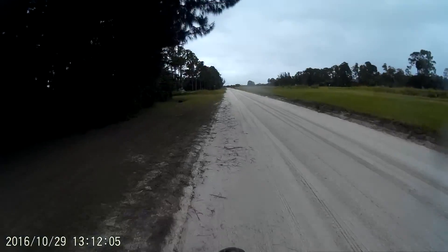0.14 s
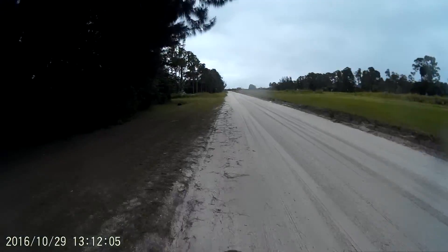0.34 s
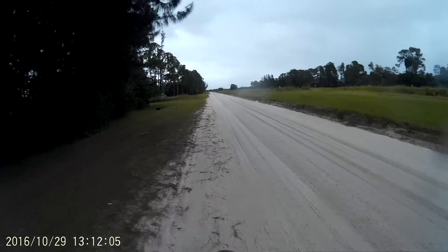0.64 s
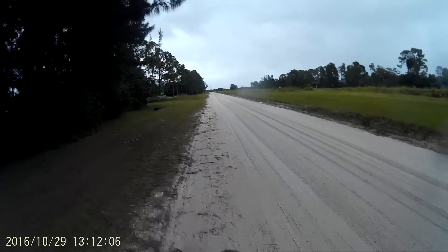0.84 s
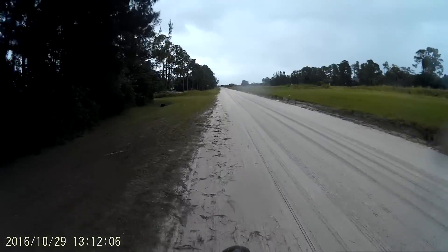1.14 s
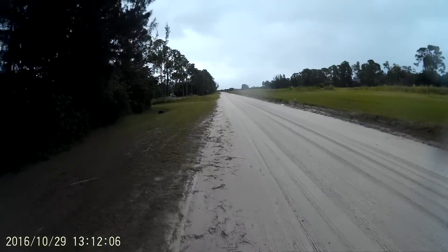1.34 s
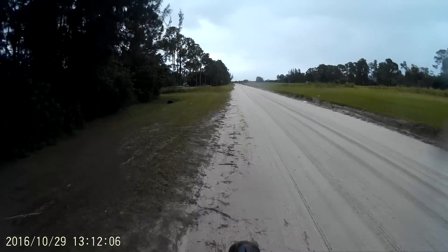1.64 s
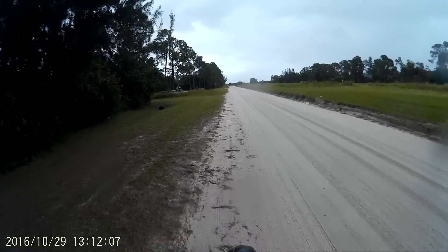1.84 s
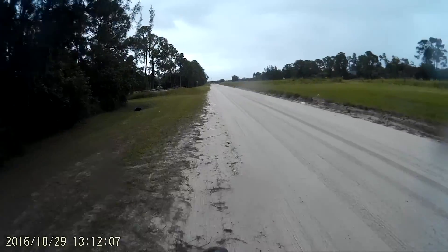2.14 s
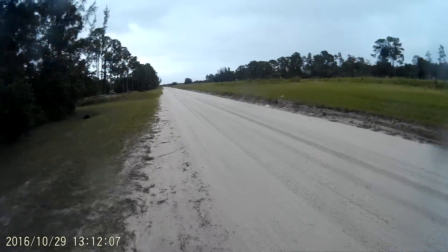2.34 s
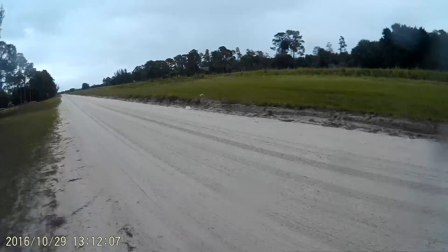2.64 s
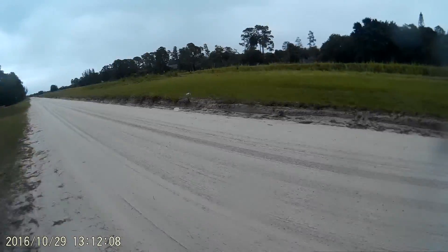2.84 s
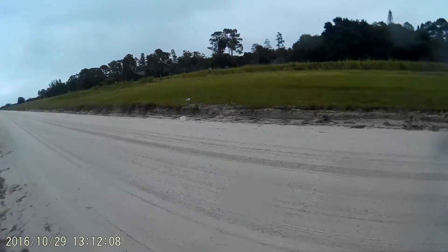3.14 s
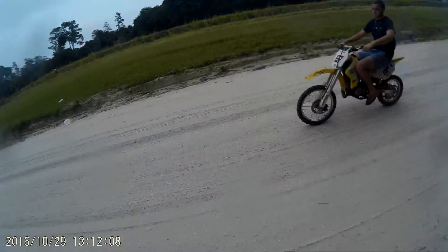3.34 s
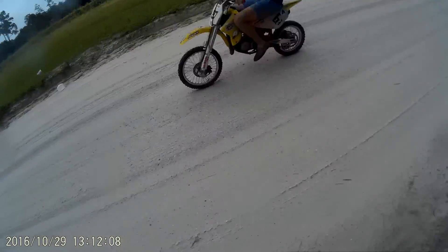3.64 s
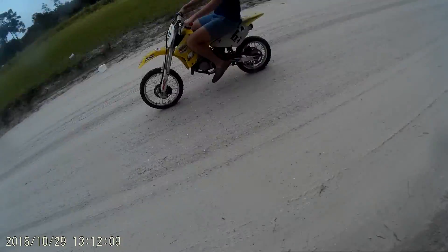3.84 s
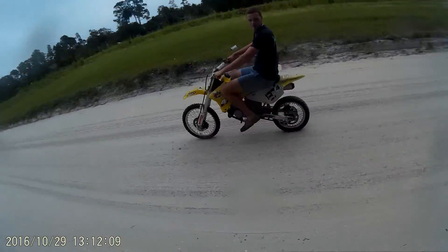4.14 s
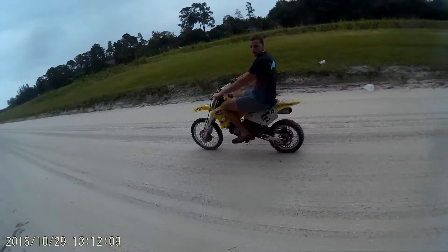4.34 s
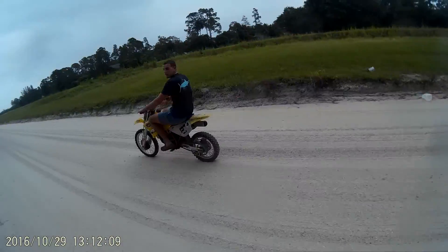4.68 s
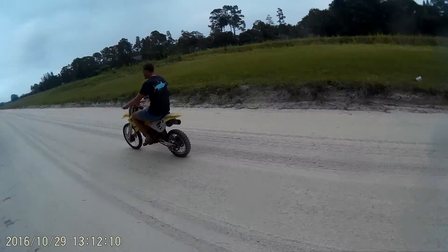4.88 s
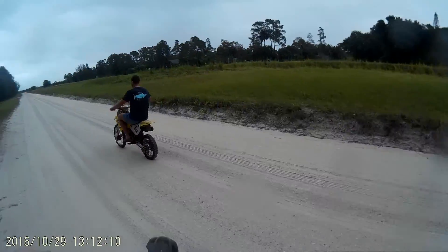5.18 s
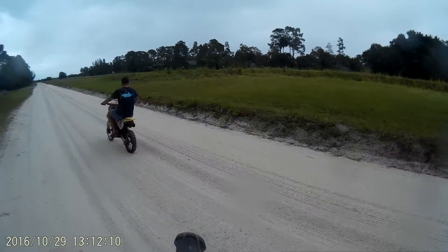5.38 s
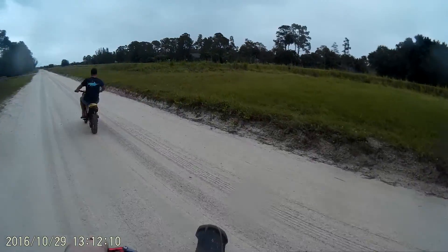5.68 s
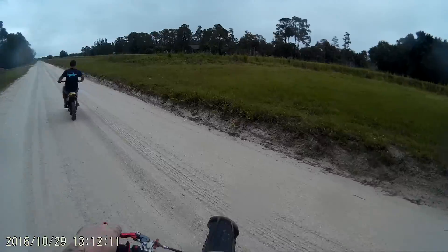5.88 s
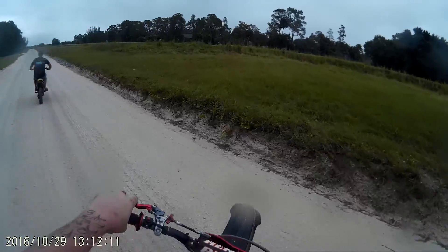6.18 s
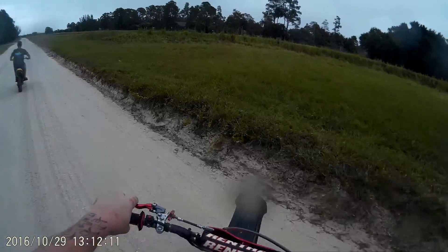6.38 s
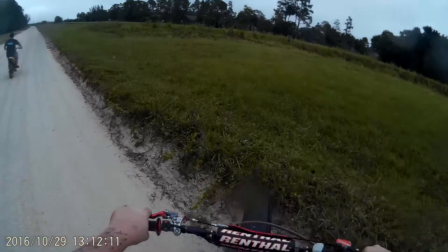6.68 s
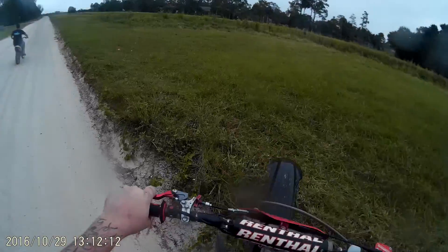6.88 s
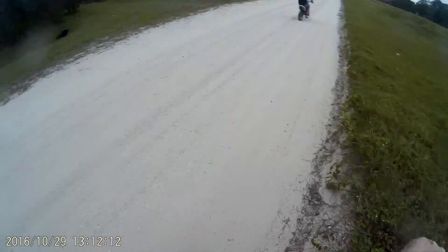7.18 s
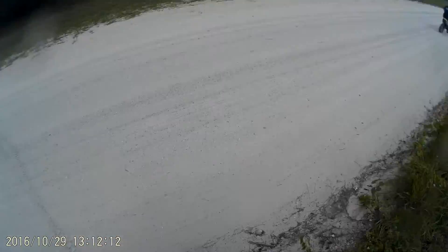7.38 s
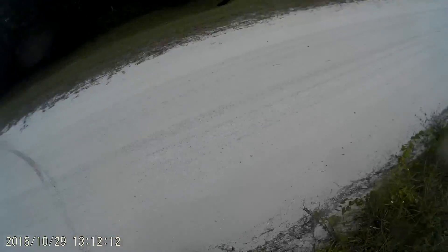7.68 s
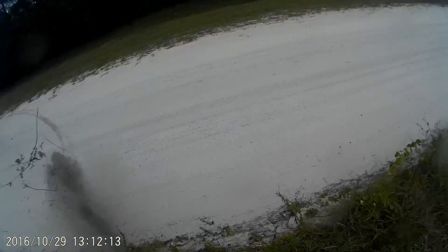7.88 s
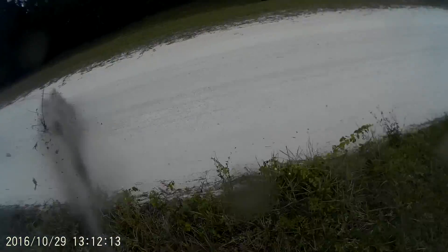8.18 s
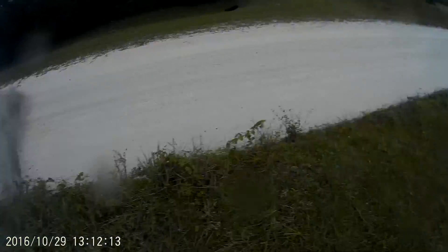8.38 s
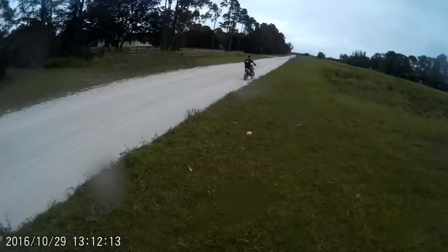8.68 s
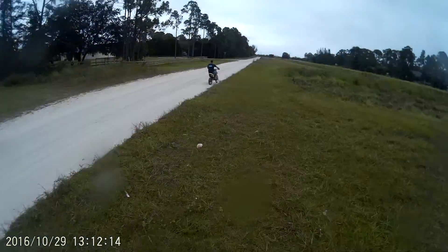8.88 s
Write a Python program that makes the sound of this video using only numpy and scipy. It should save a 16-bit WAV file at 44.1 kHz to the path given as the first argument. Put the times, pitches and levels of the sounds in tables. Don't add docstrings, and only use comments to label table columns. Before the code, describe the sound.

Heard from a cased helmet camera outdoors, a two-stroke dirt bike hums and rattles at idle with sparse soft bangs. A second bike sputters past around three to four seconds. The near engine then blips raggedly, lugs evenly, blips harder, tears into a full-throttle wheelspin, snaps twice after shut-off and revs again. Low wind rumble and tyre hiss sit underneath.

```python
import sys
import numpy as np
from scipy import signal
from scipy.fft import rfft, irfft
from scipy.io import wavfile
from scipy.ndimage import uniform_filter1d

SR = 44100
rng = np.random.default_rng(int(sys.argv[2]) if len(sys.argv) > 2 else 0)


def digitize_waveform(pressure):
    field = np.atleast_2d(pressure).T
    bounded = np.clip(field, -1, 1)
    quanta = np.round(bounded * 32767).astype(np.int16)
    wavfile.write(sys.argv[1], SR, quanta)


def gain_from_db(level_db):
    decades = np.asarray(level_db, float) / 20
    return 10 ** decades


N = 397782


def colour(x, slope, modes=(), size=8192):
    hz = np.maximum(np.arange(size // 2 + 1) * SR / size, 1)
    slope_hz, slope_db = np.transpose(slope)
    db = np.interp(np.log(hz), np.log(slope_hz), slope_db)
    db = db + sum(g / (1 + (2 * (hz - f) / max(w, f / 22)) ** 2) for f, w, g in modes)
    cepstrum = irfft(db * np.log(10) / 20)
    cepstrum[1:size // 2] *= 2
    cepstrum[size // 2 + 1:] = 0
    response = irfft(np.exp(rfft(cepstrum)))
    response = response / np.sqrt(np.sum(response ** 2))
    sounding = np.flatnonzero(x)
    start, end = sounding[0], sounding[-1] + 1
    part = signal.oaconvolve(x[start:end], response)
    out = np.zeros(N + size)
    out[start:start + len(part)] = part
    return out[:N]


def read(table, t):
    s, *columns = np.transpose(table)
    return [np.interp(t, s, c) for c in columns]


def walk(rate):
    k = int(SR / rate)
    held = np.repeat(rng.standard_normal(N // k + 1), k)
    return 1.05 * uniform_filter1d(uniform_filter1d(held, k), k)[:N]


def alike(rows, repeat):
    return signal.lfilter([np.sqrt(1 - repeat ** 2)], [1, -repeat], rows, axis=0)


def lay(s, grains):
    out = np.zeros(N + grains.shape[1])
    for start, grain in zip((np.asarray(s) * SR).astype(int), grains):
        out[start:start + len(grain)] += grain
    return out[:N]


def fade(t, a, b, edge_s):
    return np.clip(np.minimum(t - a, b - t) / edge_s, 0, 1)


# opens [t/s], crank [f/Hz], shuts [t/s], crank [f/Hz], extra hum [level/dB]
TWISTS = [(-.1, 43.5, 0.0, 43.2, -3), (0.11, 41.1, 0.32, 48.8, -7), (.5, 43.8, .85, 38.1, -5),
          (1.72, 33, 2.52, 34.2, 2), (2.62, 33.9, 2.76, 38.2, 1), (3.0, 37.3, 3.11, 45.1, 0),
          (3.91, 34.6, 4.12, 46.3, 2), (4.15, 46.4, 4.26, 45.8, 2), (4.82, 33.4, 4.97, 42.4, 3),
          (5.15, 39.2, 5.31, 59.8, 0), (5.5, 54.4, 5.6, 57.6, 0), (5.66, 56.9, 5.82, 41.5, 0),
          (6.22, 41.2, 6.382, 52.2, 4), (6.676, 43.6, 6.848, 66.6, -3), (7.144, 53.2, 7.274, 72.8, 2),
          (7.36, 73.1, 8.0, 63.2, -4), (8.202, 54.2, 8.274, 62.3, 2), (8.58, 52.4, 8.694, 67.2, -1),
          (8.96, 56.3, 9.1, 56, -3)]
# [t/s], crank [f/Hz]
FREE_WHEEL = [
    (7.36, 74),
    (7.44, 112),
    (7.5, 122),
    (7.575, 113),
    (7.66, 94),
    (7.795, 110),
    (7.88, 98),
    (7.95, 68),
    (8.0, 63.2),
]
# crank [f/Hz], hum [level/dB]
FRAME_HUM = [(33, -45), (38, -39), (46, -32), (57, -29), (67, -33), (74, -33), (95, -43), (120, -39)]
COAST_S, INERTIA_S = .6, .045
SLACK_DB_PER_HZ = -.35


def throttle(t):
    opens, low, shuts, high, extra_db = np.transpose(TWISTS)
    k = np.clip(np.searchsorted(opens, t, side="right") - 1, 0, len(opens) - 2)
    rise = np.clip((t - opens[k]) / (shuts[k] - opens[k]), 0, 1)
    coasted = np.expm1(-np.maximum(t - shuts[k], 0) / COAST_S)
    sag = coasted / np.expm1(-(opens[k + 1] - shuts[k]) / COAST_S)
    hz = low[k] + (high[k] - low[k]) * rise + (low[k + 1] - high[k]) * np.minimum(sag, 1)
    free = (t > FREE_WHEEL[0][0]) & (t < FREE_WHEEL[-1][0])
    hz = np.where(free, read(FREE_WHEEL, t)[0], hz)
    hz = uniform_filter1d(hz, int(INERTIA_S * SR))
    slack_db = SLACK_DB_PER_HZ * np.abs(high - low)
    knots = np.c_[opens, opens + (shuts - opens) / 2, shuts].ravel()
    twist_db = np.interp(t, knots, np.c_[slack_db, extra_db, extra_db].ravel())
    return hz, read(FRAME_HUM, hz)[0] + twist_db


def crank_hum(turns, hum_db):
    wave = np.sin(2 * np.pi * turns) + gain_from_db(-36.5) * np.sin(4 * np.pi * turns)
    return np.sqrt(2) * gain_from_db(hum_db) * wave


# multiple of the turn, [level/dB]
PISTON_AIR = [(1, 5), (2, -12), (3, -12), (4, -10), (5, -8), (6, -8), (7, -1), (8, -9), (9, -8), (10, -12),
              (11, -10), (12, -8), (13, -3), (14, -2), (15, -10), (16, -7), (17, -10), (18, -5), (19, -9),
              (20, -6), (21, -9), (22, -10), (23, -9), (24, -10), (25, -10), (26, -11), (27, -13),
              (28, -12), (29, -13), (30, -13), (31, -12), (32, -12)]
# [f/Hz], width [f/Hz], [level/dB]
CAMERA_CASE = [(453, 60, 9), (580, 27, -4), (766.5, 47, 8.5), (1150.5, 89, 10), (1358, 136, -7),
               (1551, 62, 6), (2052, 206, 5.5), (2316, 152, -12), (2800, 38, 8.5), (3165, 160, 9),
               (3702, 160, -13.5), (3825, 44, 12), (4070, 660, -4.5), (4990, 320, 6), (5860, 120, 3),
               (6340, 33, 2.5), (8860, 650, -7), (10400, 350, 5)]
PUMP_DB, PUMP_SLOPE = -44, .05
PUMP_DB_PER_OCTAVE = 12


def pumping(hz, turns, over_db):
    step = np.arange(1024) / 1024
    stroke = sum(gain_from_db(db) * np.sin(2 * np.pi * (k * step + rng.random())) for k, db in PISTON_AIR[1:])
    air_strokes = np.interp(turns % 1, step, stroke / stroke.std(), period=1)
    level_db = PUMP_DB + PUMP_SLOPE * over_db + PUMP_DB_PER_OCTAVE * np.log2(np.minimum(hz, 65) / 40)
    half_case = [(f, w, db / 2) for f, w, db in CAMERA_CASE]
    slope = [(60, -26), (150, 1.5), (1500, -3.5), (2500, -26)]
    return colour(air_strokes * gain_from_db(level_db - 8), slope, half_case)


def stroke_gate(turns):
    angle = turns % 1
    return .5 + np.exp(-angle / 0.12) + .5 * np.exp(-((angle + .45) % 1) / 0.38)


REPEAT = .93
LOOSE_HZ, TIGHT_HZ = 5, 54


def knocking(hz, turns):
    pattern = alike(rng.standard_normal((600, 1024)), REPEAT)
    repeated = pattern[turns.astype(int), (turns % 1 * 1024).astype(int)]
    locked = np.clip((hz - LOOSE_HZ) / (TIGHT_HZ - LOOSE_HZ), 0, 1)
    return locked * repeated + np.sqrt(1 - locked ** 2) * rng.standard_normal(N)


# [f/Hz], [level/dB]
RATTLE_COLOUR = [(150, -36), (400, -4.5), (800, 0), (1200, -2), (2200, -7), (3300, -13.5), (4500, -40.5),
                 (8000, -47.5)]
CLATTER_DB_PER_OCTAVE = -4


def clatter(hz, knocks, gate, shake_db):
    level_db = shake_db + CLATTER_DB_PER_OCTAVE * np.log2(np.clip(hz, 46, 65) / 46)
    return colour(knocks * gate * gain_from_db(level_db + 1.2 * walk(20)), RATTLE_COLOUR, CAMERA_CASE)


# from [t/s], to [t/s], extra [level/dB]
TYRES_ROLL = [
    (-.1, 1.62, 5.5),
    (1.75, 3.05, 5.5),
    (4.3, 4.7, 3),
    (6.5, 7.2, 4),
    (7.9, 8.2, 4),
]
# [f/Hz], [level/dB]
HISS_COLOUR = [(2500, -6), (4200, 2), (7000, -5.5), (10500, -10.5), (12200, -13), (13500, -30)]
# [f/Hz], width [f/Hz], [level/dB]
COOLING_FINS = [(4830, 90, 4), (5980, 80, 4), (6380, 70, 2.5), (7450, 260, 3.5), (9900, 500, 2.5)]
HISS_DB, HISS_SLOPE = -55.5, 1.1


def hiss(t, gate, over_db):
    rolling_db = sum(db * fade(t, a, b, .06) for a, b, db in TYRES_ROLL)
    level_db = HISS_DB + HISS_SLOPE * over_db + rolling_db
    noise = rng.standard_normal(N) * np.sqrt(gate)
    return colour(noise * gain_from_db(level_db + 1.2 * walk(25)), HISS_COLOUR, CAMERA_CASE + COOLING_FINS)


# [t/s], [level/dB]
TANK_RINGS = [(.3, -34), (2.95, -36), (3.07, -26.5), (3.3, -31), (4.07, -24.5), (4.2, -27), (6.45, -29),
              (7.2, -34), (7.91, -31), (8.4, -36)]
# [f/Hz], width [f/Hz], [level/dB]
TANK_PANEL = (1162, 95, 20)
RING_DB, RING_RISE_S, RING_FALL_DB_PER_S = -46, .03, 40


def tank(t, knocks, gate, over_db):
    ring = gain_from_db(RING_DB + over_db)
    for s, db in TANK_RINGS:
        swell = np.clip((t - s) / RING_RISE_S, 0, 1)
        ring = ring + swell * gain_from_db(db - RING_FALL_DB_PER_S * np.maximum(t - s, 0))
    slope = [(600, -20), (TANK_PANEL[0], 0), (2000, -20), (4000, -50)]
    return colour(knocks * np.sqrt(gate) * ring * gain_from_db(-9.5), slope, [TANK_PANEL])


# [t/s], [level/dB]
BIKE_SHAKE = [(0.0, -34), (0.35, -33), (1.53, -36), (1.64, -41), (2.3, -44), (2.98, -40.5), (3.29, -36),
              (3.86, -38), (4.08, -33), (4.76, -43), (5.37, -29), (6.2, -34), (6.41, -30), (6.7, -35),
              (6.88, -29.5), (7.91, -28.5), (8.18, -35), (9.02, -30)]


def crank(t, hz, hum_db):
    turns = np.cumsum(hz) / SR
    shake_db = read(BIKE_SHAKE, t)[0]
    over_db = shake_db + 35
    gate = stroke_gate(turns)
    knocks = knocking(hz, turns)
    sound = crank_hum(turns, hum_db) + pumping(hz, turns, over_db)
    sound += clatter(hz, knocks, gate, shake_db)
    return sound + hiss(t, gate, over_db) + tank(t, knocks, gate, over_db)


# [t/s], [level/dB]
WIND_AND_SAND = [(0.0, -53), (0.48, -50.5), (0.78, -53), (1.61, -52.5), (2.03, -53.5), (4.0, -54),
                 (4.4, -57), (5.53, -59.5), (6.0, -46), (6.53, -61), (7.26, -53), (7.41, -50), (7.81, -51),
                 (8.06, -51), (9.02, -49)]


def air(t):
    gusts = gain_from_db(read(WIND_AND_SAND, t)[0] + 2 * walk(6))
    slope = [(15, -15), (40, 1), (120, -11.5), (250, -2), (600, -59)]
    return colour(rng.standard_normal(N) * gusts, slope) * gain_from_db(6.5)


STRONG_DB, THUMP_KEEPS, CRACK_LOSES = -13, .45, .35


def balance(rows, thump_db, crack_db, scatter_db):
    s, db = np.transpose(rows)[:2]
    weak = STRONG_DB - db
    thump_uneven, crack_uneven = scatter_db * rng.standard_normal((2, len(s)))
    thump = thump_db + THUMP_KEEPS * weak + thump_uneven
    crack = crack_db - CRACK_LOSES * weak + crack_uneven
    return np.c_[s, db, thump, crack]


def every_turn(table, hz, scatter_db):
    s, *columns = np.transpose(table)
    a, b = int(s[0] * SR), int(s[-1] * SR)
    whole_turns = np.floor(np.cumsum(hz[a:b]) / SR)
    times = (a + np.flatnonzero(np.diff(whole_turns, prepend=-1))) / SR
    rows = np.transpose([times] + [np.interp(times, s, c) for c in columns])
    uneven = scatter_db * rng.standard_normal(len(rows))
    rows[:, 1] += uneven
    rows[:, 2] -= uneven
    return rows


# [f/Hz], [level/dB]
THUMP_COLOUR = [(60, -43.5), (150, -7), (230, -3.5), (500, -5.5), (900, 7), (2000, -56)]
# [f/Hz], [level/dB]
BANG_COLOUR = [(300, -18.5), (700, -5), (1200, 2), (2000, -0.5), (3200, -3.5), (4500, -18), (7000, -40.5)]
# [f/Hz], [level/dB]
CRACK_COLOUR = [(2500, -23.5), (4500, -1), (7000, -1), (10500, -3.5), (12000, -5), (13200, -22),
                (15500, -30)]
EARLY = 1.1
SNAP, SNAP_MS = .8, 1.4


def firings(rows, pipe, repeat, thump_db, bang_db, crack_db, rise_ms, burn_ms, tail_db, tail_ms, front,
            lag_ms=0., fins=COOLING_FINS):
    s, db, low_db, high_db = (c[:, None] for c in np.transpose(rows))
    ms = np.arange(3000) / SR * 1000
    decay = np.exp(-ms / burn_ms) + gain_from_db(tail_db) * np.exp(-ms / tail_ms)
    burn = (1 - np.exp(-ms / rise_ms)) * decay
    late = np.interp(ms - lag_ms, ms, burn)
    chance = rng.standard_normal((len(s), 3, len(ms)))
    shocks = alike(chance[:, 0], repeat) * gain_from_db(3.02 * chance[0, 1])
    shocks *= (EARLY * burn + late) / (1 + EARLY)
    shocks[:, 50 + int(lag_ms * SR / 1000)] -= front * gain_from_db(1.5 * chance[:, 1, 0])
    pulse = np.exp(-((ms - lag_ms - 2.2) / 0.18) ** 2)
    thump = gain_from_db(db + low_db + thump_db) * (pulse + 0.4 * shocks) / 25
    bang = gain_from_db(db + bang_db) * shocks
    spit = (burn + SNAP * np.exp(-ms / SNAP_MS)) * chance[:, 2] * gain_from_db(2.02 * chance[:, 1])
    crack = gain_from_db(db + high_db + crack_db) * (spit + 0.33 * shocks)
    starts = s[:, 0]
    sound = colour(lay(starts, thump), THUMP_COLOUR, pipe)
    sound += colour(lay(starts, bang), BANG_COLOUR, CAMERA_CASE + pipe[1:])
    return sound + colour(lay(starts, crack), CRACK_COLOUR, CAMERA_CASE + fins)


# [t/s], bang [level/dB]
IDLE_FIRINGS = [(0.126, -13), (0.2764, -13), (1.8312, -31.5), (1.9839, -28), (2.1061, -26), (2.245, -38),
                (2.3747, -35), (2.4494, -45), (2.4924, -32), (2.6356, -38), (2.6943, -20.5), (2.8772, -40),
                (3.0094, -23.5), (3.0585, -16.5)]
# [f/Hz], width [f/Hz], [level/dB]
SIDE_PIPE = [(437.6, 89.4, 22), (295.6, 85.3, 9.5), (1486, 118, 8)]


def idling():
    rows = balance(IDLE_FIRINGS, -10.5, -14, 1.0)
    return firings(rows, SIDE_PIPE, .63, thump_db=27, bang_db=-6, crack_db=-1,
                   rise_ms=2.4, burn_ms=9.3, tail_db=-13, tail_ms=24, front=7.8)


# from [t/s], to [t/s], [level/dB]
BUZZES = [(1.113, 1.194, -68), (1.991, 2.174, -64), (2.196, 2.29, -69), (2.987, 3.24, -66),
          (3.98, 4.243, -65), (4.979, 5.18, -63), (6.98, 7.18, -66), (7.98, 8.22, -65)]


def insect(t):
    on = sum(gain_from_db(db) * fade(t, a, b, .01) for a, b, db in BUZZES)
    buzz = rng.standard_normal(N) * (1 + 0.34 * np.sin(2 * np.pi * 90 * t))
    slope = [(9500, -40), (10800, -11), (11700, -2), (12300, -4), (13000, -40)]
    return colour(on * buzz, slope, [(11500, 120, 8)])


# [t/s], [level/dB]
GRAINS = [
    (1.265, -33),
    (1.3368, -29),
    (1.862, -35),
    (1.937, -40),
    (1.9923, -53),
    (2.0498, -46),
    (2.2159, -50),
    (4.8537, -62),
]


def grit():
    s, db = np.transpose(GRAINS)
    ticks = gain_from_db(db[:, None] - 7.5) * rng.standard_normal((len(s), 400)) * np.exp(-np.arange(400) / 60)
    return colour(lay(s, ticks), [(4000, -22), (9000, -12), (10800, 0), (12500, -15), (14000, -30)])


# [t/s], bang [level/dB], crack rel [level/dB]
PASSING_FIRINGS = [(3.2357, -35, -22), (3.2851, -41, -26), (3.3334, -22, -30), (3.3665, -27, -17),
                   (3.3937, -26, -19), (3.435, -24, -19), (3.459, -23.5, -24), (3.4789, -23.5, -17),
                   (3.5119, -21, -28), (3.5436, -21.5, -20), (3.5853, -18.5, -24), (3.6287, -21.5, -20),
                   (3.6502, -19, -26), (3.708, -13.5, -17), (3.7935, -15, -17), (3.8502, -18.5, -23),
                   (3.9073, -12, -11), (3.9575, -30, -26), (3.988, -26.5, -23), (4.0147, -11.5, -9),
                   (4.062, -8, -10.5), (4.1252, -20.5, -20), (4.1483, -22, -20), (4.1706, -11.5, -15),
                   (4.2217, -20, -26), (4.2962, -28, -26), (4.3872, -24.5, -18), (4.4643, -29, -24),
                   (4.5894, -23, -20.5)]
# [f/Hz], width [f/Hz], [level/dB]
PASSING_FINS = [(7000, 2500, -7), (10300, 2200, 4)]


def passing_bike():
    rows = balance(PASSING_FIRINGS, -11.5, 0, 1.5)
    rows[:, 3] = np.transpose(PASSING_FIRINGS)[2]
    return firings(rows, SIDE_PIPE, .2, thump_db=27, bang_db=-11.5, crack_db=-9, fins=PASSING_FINS,
                   rise_ms=.6, burn_ms=3.5, tail_db=-10, tail_ms=16, front=15)


# [t/s], bang [level/dB]
BLIP_FIRINGS = [(4.8829, -18.5), (4.9281, -13.5), (5.1673, -29), (5.1907, -12), (5.2309, -13),
                (5.2978, -14), (5.3991, -17), (5.448, -25), (5.4902, -18), (5.5462, -11.5), (5.5975, -10.5),
                (5.651, -11), (5.7263, -22.5), (6.309, -14), (6.3486, -14.5), (6.4066, -14),
                (6.7035, -14.5), (6.761, -11.5), (6.7775, -12.5), (6.826, -10.5), (7.1822, -11.5),
                (7.2005, -10), (7.2165, -20), (7.231, -10), (7.246, -12), (7.3563, -19)]
# [f/Hz], width [f/Hz], [level/dB]
EXPANSION_PIPE = [(290, 115, 18), (480, 70, 15), (820, 90, 7)]


def blipping():
    rows = balance(BLIP_FIRINGS, -7.5, -15, 1.5)
    return firings(rows, EXPANSION_PIPE, .65, thump_db=28.5, bang_db=-7.5, crack_db=-2,
                   rise_ms=.8, burn_ms=9, tail_db=-11, tail_ms=24, front=10, lag_ms=2.4)


# from [t/s], to [t/s], puff [level/dB]
PUFF_SPANS = [
    (5.14, 5.76, -29),
    (6.27, 6.42, -30),
    (6.705, 6.83, -23),
    (7.16, 7.27, -23),
    (7.335, 7.37, -20),
    (8.55, 9.0, -28),
]
LUGGING_TIMES = [5.7723, 5.8233, 5.872, 5.9227, 5.9705, 6.0181, 6.067, 6.1174, 6.1653, 6.2188, 6.2665]
LUGGING_PUFF_DB, LUGGING_DB = -28, -15


def pipe_puffs(hz):
    spans = []
    for a, b, db in PUFF_SPANS:
        ends = [(a, -45, db + 45, -20), (b, -45, db + 45, -20)]
        spans.append(every_turn(ends, hz, scatter_db=0))
    midway = np.convolve(LUGGING_TIMES, [.5, .5], "valid")
    between = [(s, -45, LUGGING_PUFF_DB + 45, -20) for s in midway]
    return firings(np.vstack(spans + [between]), EXPANSION_PIPE, .5, thump_db=28.5, bang_db=-7.5, crack_db=-2,
                   rise_ms=2.2, burn_ms=8, tail_db=-11, tail_ms=20, front=3)


def lugging():
    rows = balance([(s, LUGGING_DB) for s in LUGGING_TIMES], -7, -12, .8)
    return firings(rows, EXPANSION_PIPE, .9, thump_db=28.5, bang_db=-7.5, crack_db=-2,
                   rise_ms=.9, burn_ms=10, tail_db=-11, tail_ms=24, front=9, lag_ms=1.5)


# [t/s], bang [level/dB], pipe thump rel [level/dB], crack rel [level/dB]
FULL_THROTTLE = [
    (7.3716, -3.5, -9, -14),
    (7.42, -0.5, -12.5, -17.5),
    (7.48, -1.5, -8, -18),
    (7.6, -1.2, -10, -18.5),
    (7.75, -1.5, -10.5, -17.5),
    (7.81, 1.5, -12, -18),
    (7.85, -1.5, -12, -17),
    (7.86, -10.5, -11, -23),
    (7.878, 3, -25, -17),
]
# [f/Hz], width [f/Hz], [level/dB]
PIPE_WHEN_HOT = [(303.7, 194, 19.5), (2085, 418, 4), (2110, 130, 2), (1077, 137, 0.5), (480.2, 70, 14.5),
                 (780, 260, -5), (1700, 300, 1)]


def full_throttle(hz):
    rows = every_turn(FULL_THROTTLE, hz, scatter_db=0.5)
    return firings(rows, PIPE_WHEN_HOT, .78, thump_db=24.5, bang_db=-10, crack_db=-4,
                   rise_ms=.5, burn_ms=2.4, tail_db=-7, tail_ms=10, front=10)


# [t/s], bang [level/dB], thump rel [level/dB], crack rel [level/dB]
AFTER_BANGS = [
    (8.2372, -9.5, -15.5, -16.5),
    (8.3876, -6.5, -13.5, -14.5),
]


def after_bangs():
    return firings(AFTER_BANGS, PIPE_WHEN_HOT, .42, thump_db=24.5, bang_db=-8.5, crack_db=-1.5,
                   rise_ms=.54, burn_ms=3.04, tail_db=-6.5, tail_ms=13.4, front=11.4)


# [t/s], bang [level/dB]
SPIN_FIRINGS = [(8.5625, -26), (8.5845, -12), (8.601, -10.5), (8.6155, -20), (8.647, -10.5),
                (8.6765, -12.5), (8.737, -12.5), (8.752, -13.5), (8.802, -10), (8.8185, -10.5),
                (8.871, -9.5), (8.8875, -11), (8.9432, -10), (8.985, -12.5)]


def spinning():
    rows = balance(SPIN_FIRINGS, -4, -14, 1.5)
    return firings(rows, EXPANSION_PIPE, .2, thump_db=25.5, bang_db=-8.5, crack_db=-3,
                   rise_ms=.69, burn_ms=4.77, tail_db=-5, tail_ms=23, front=12, lag_ms=2.4)


def scene():
    t = np.arange(N) / SR
    hz, hum_db = throttle(t)
    sound = crank(t, hz, hum_db) + air(t)
    sound += idling() + insect(t) + grit()
    sound += passing_bike()
    sound += blipping() + pipe_puffs(hz) + lugging()
    sound += full_throttle(hz) + after_bangs() + spinning()
    return sound[None]


def top_cut(x):
    return signal.sosfilt(signal.butter(12, 16500, fs=SR, output="sos"), x)


MIC_DB, CEILING, TOP_HZ = -65.5, .7, 15900


def record(dry):
    noisy = dry + gain_from_db(MIC_DB) * rng.standard_normal(N)
    rounded = noisy / (1 + (noisy / CEILING) ** 4) ** .25
    top = signal.ellip(8, .2, 70, TOP_HZ, fs=SR, output="sos")
    mix = signal.sosfilt(top, rounded)
    return top_cut(mix)


dry = scene()
out = record(dry)
digitize_waveform(out)
```